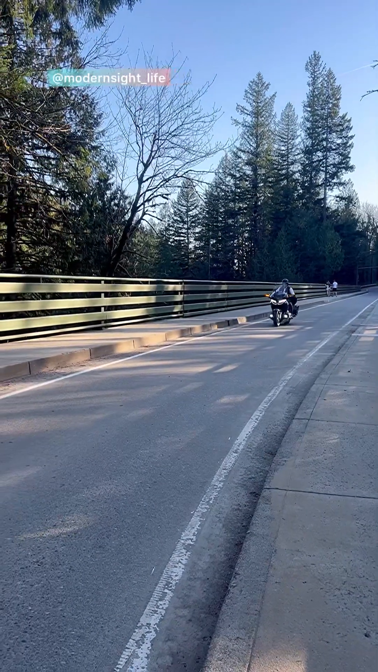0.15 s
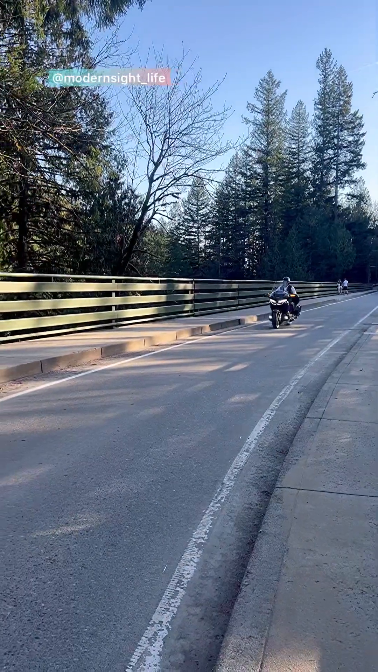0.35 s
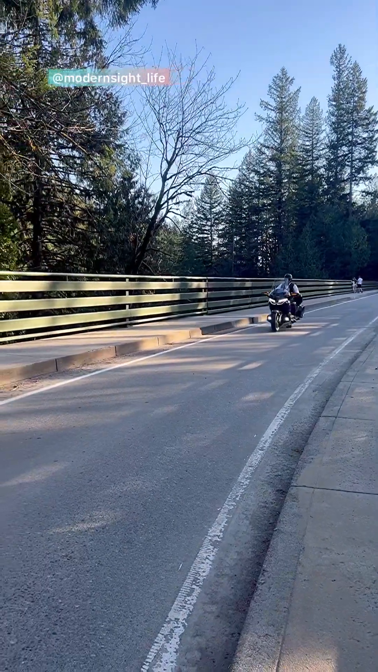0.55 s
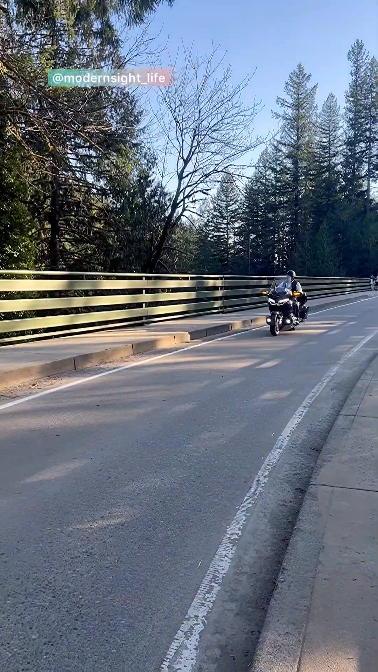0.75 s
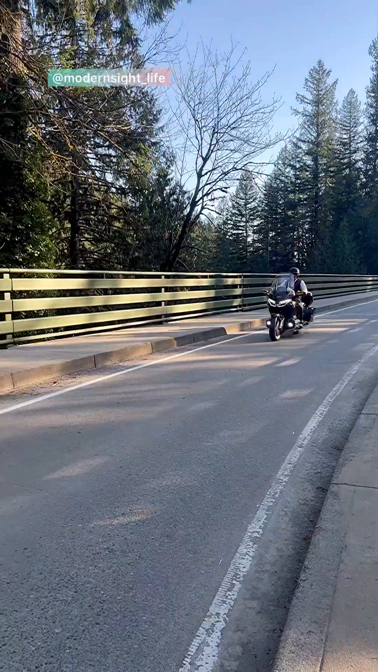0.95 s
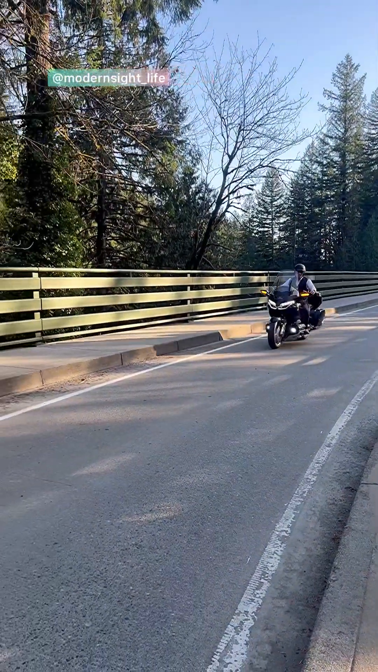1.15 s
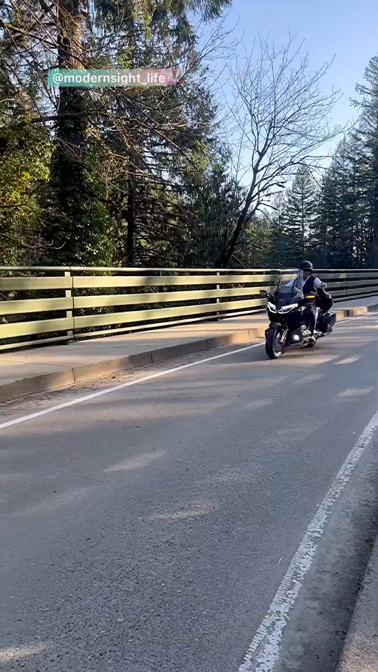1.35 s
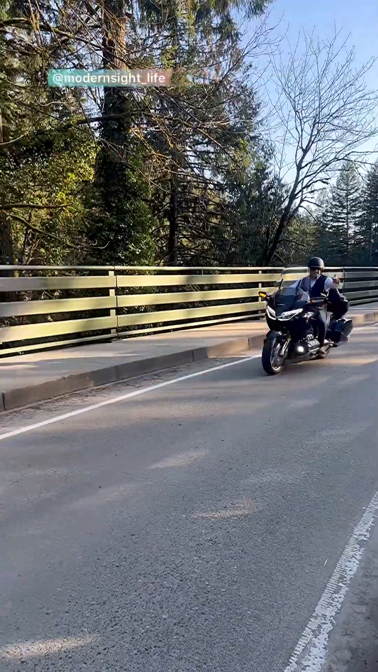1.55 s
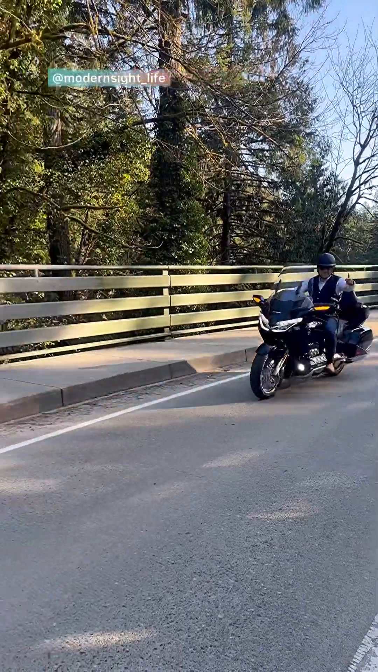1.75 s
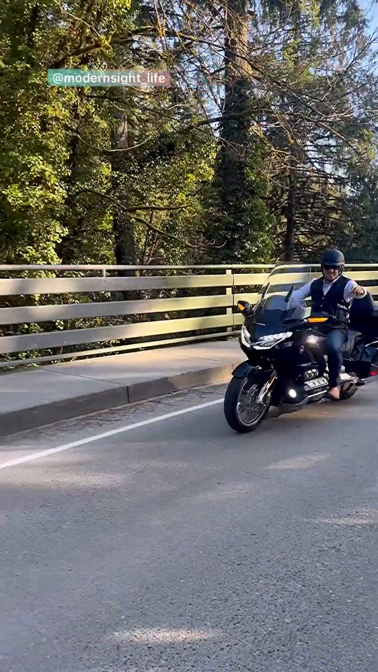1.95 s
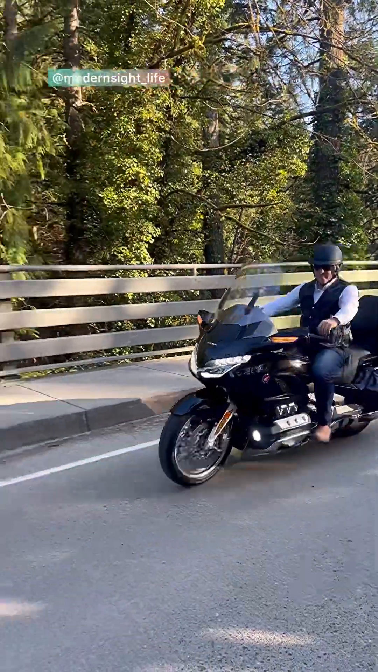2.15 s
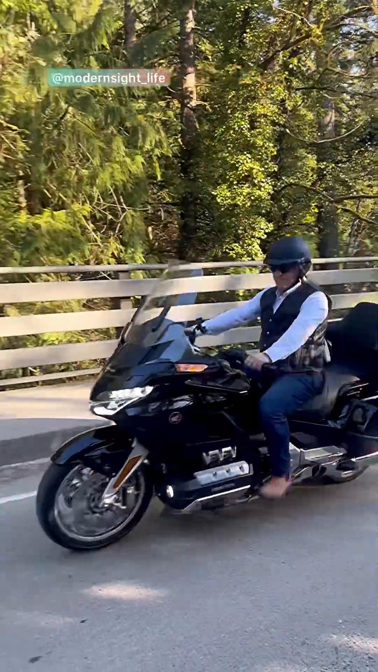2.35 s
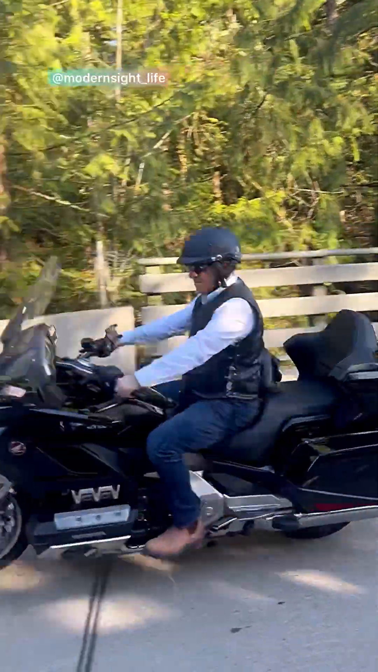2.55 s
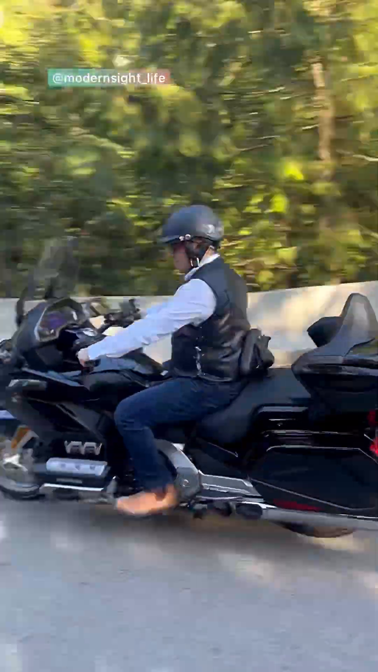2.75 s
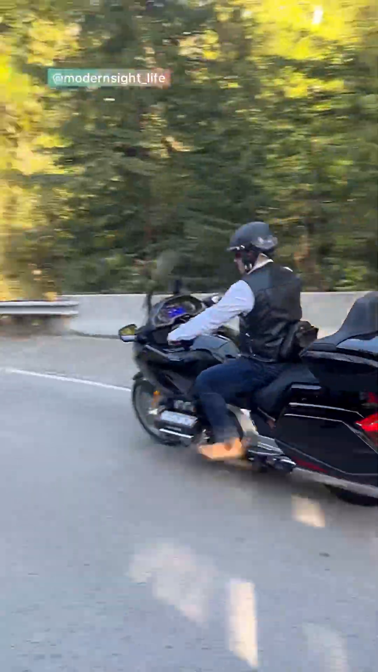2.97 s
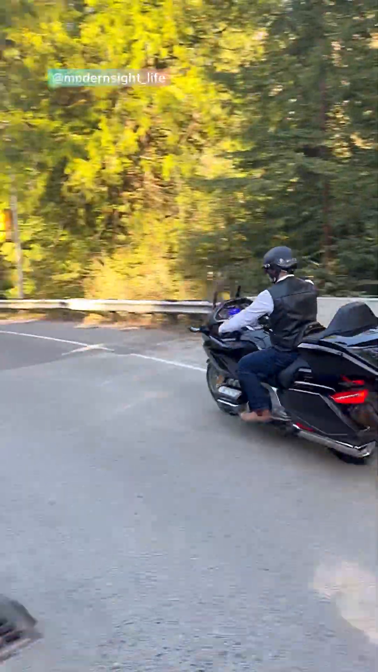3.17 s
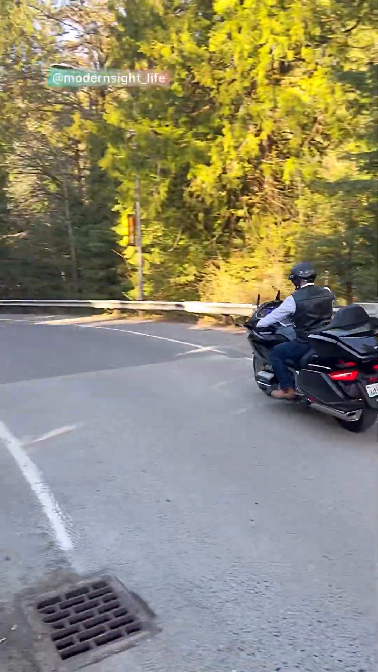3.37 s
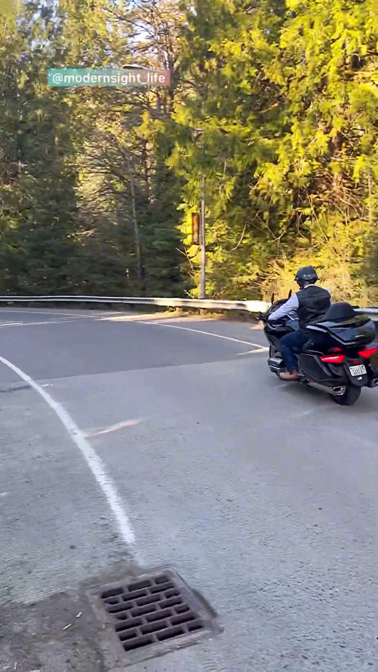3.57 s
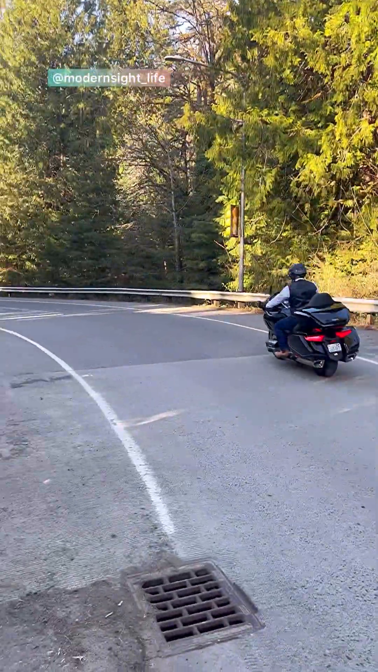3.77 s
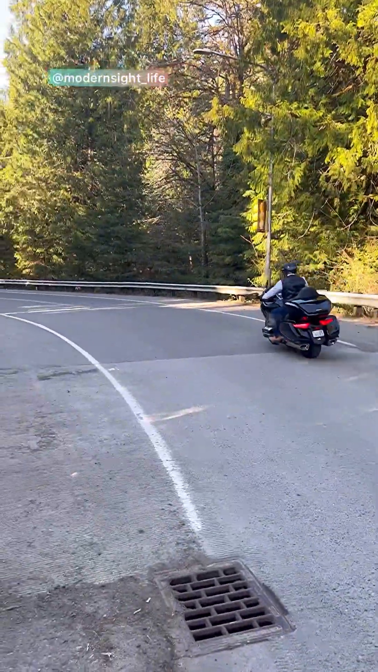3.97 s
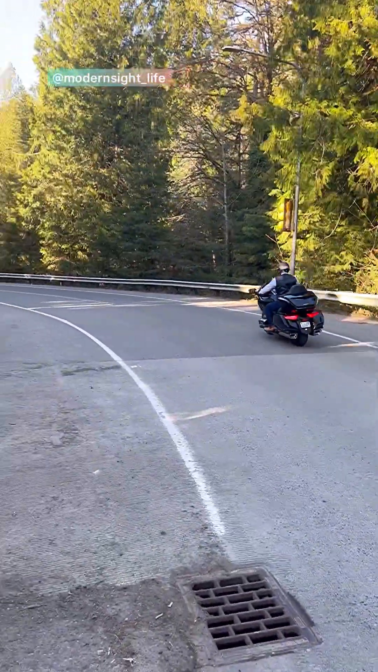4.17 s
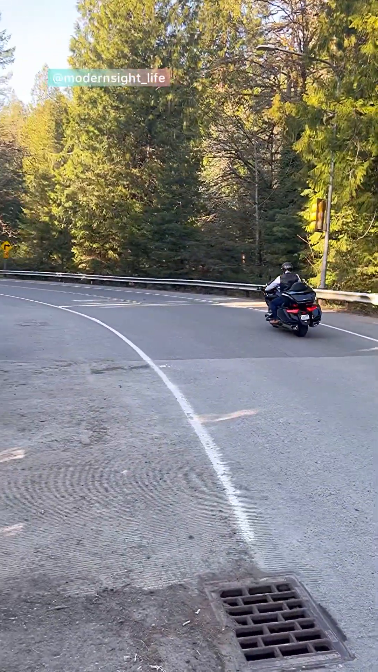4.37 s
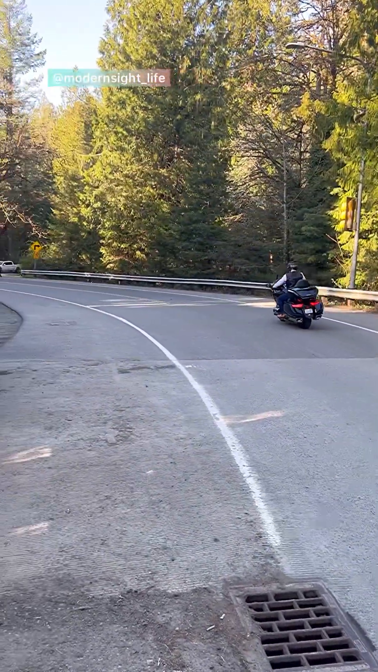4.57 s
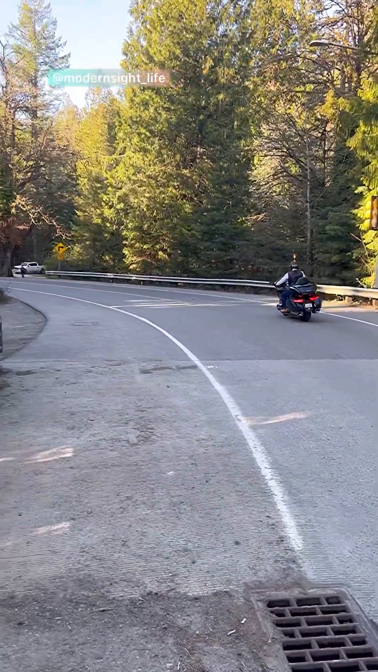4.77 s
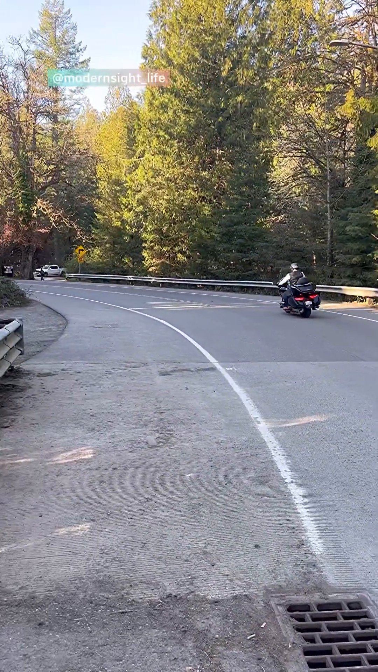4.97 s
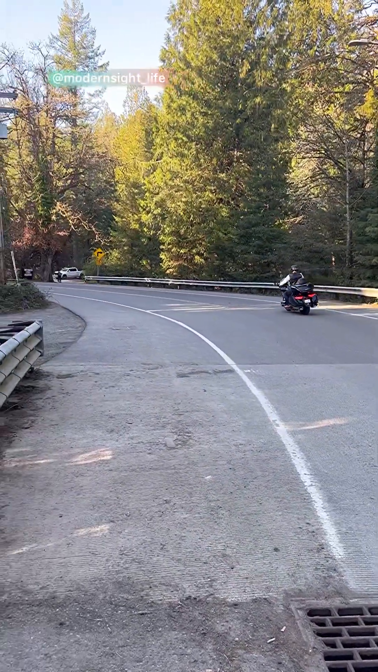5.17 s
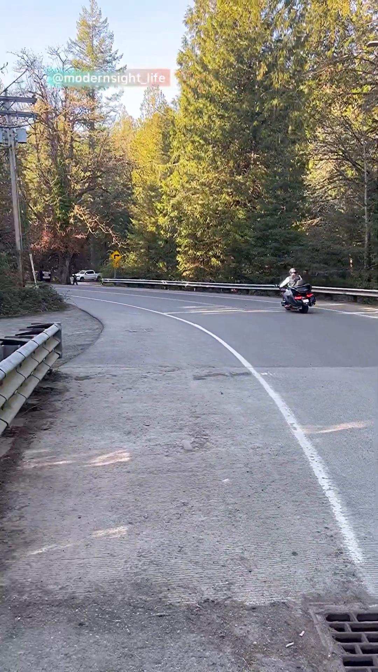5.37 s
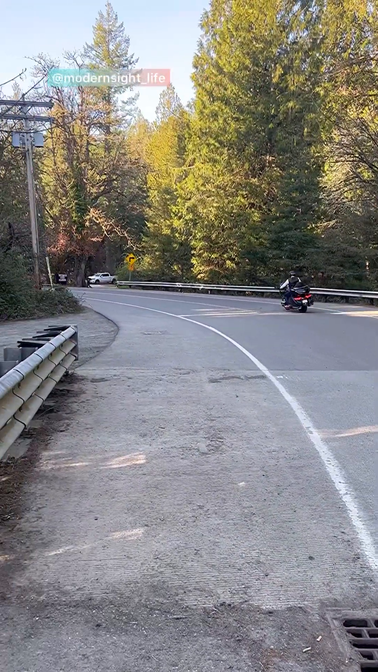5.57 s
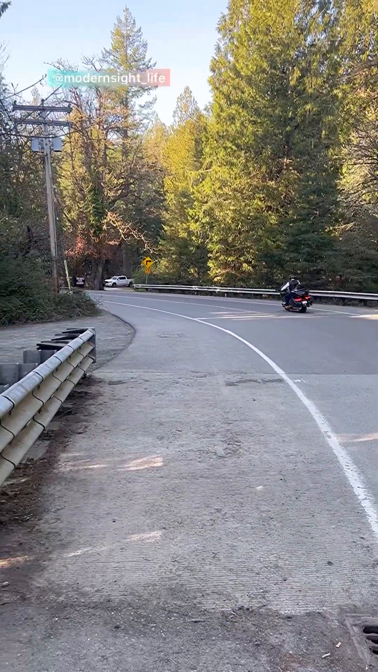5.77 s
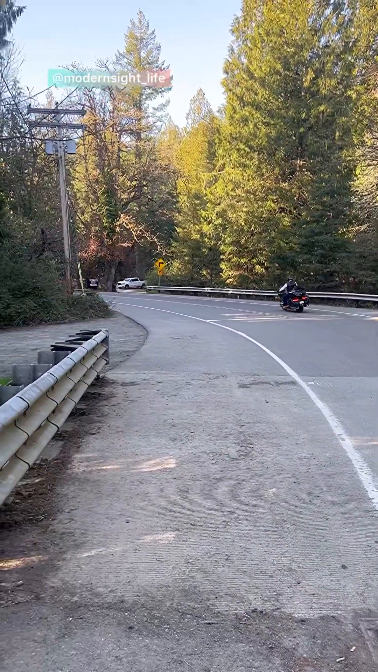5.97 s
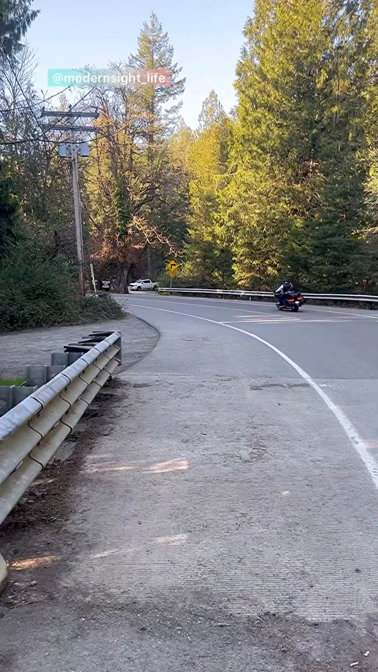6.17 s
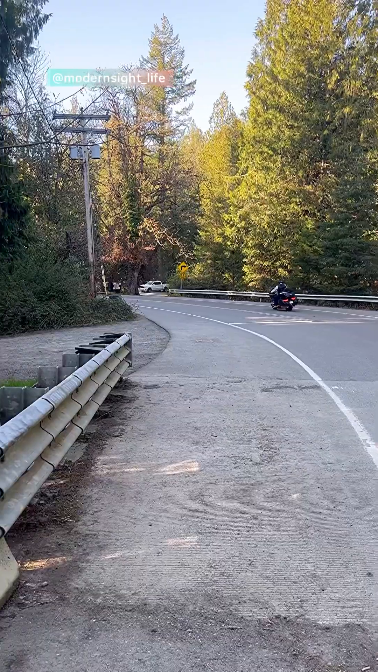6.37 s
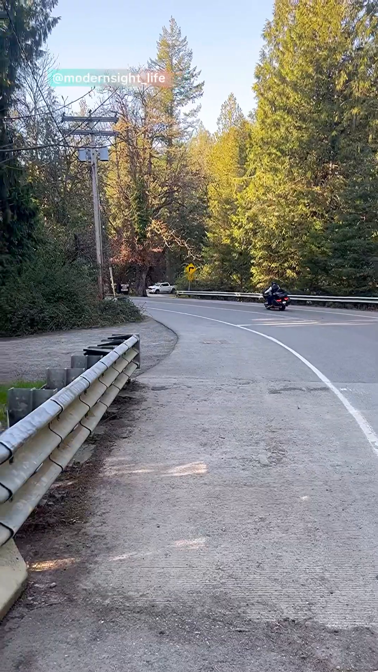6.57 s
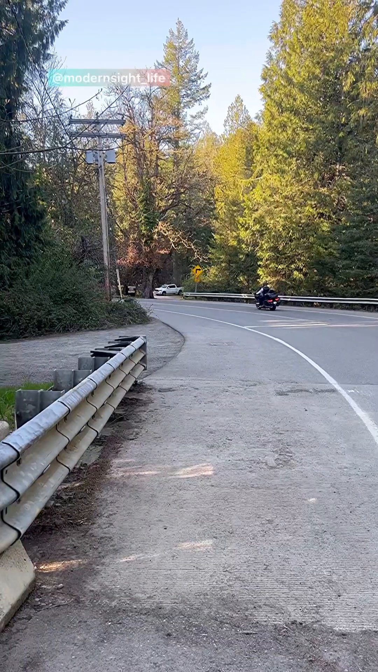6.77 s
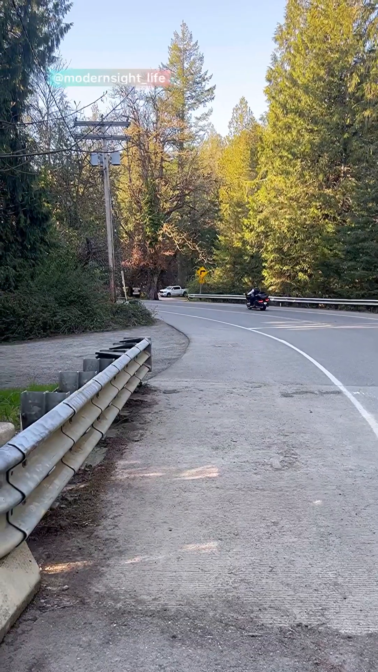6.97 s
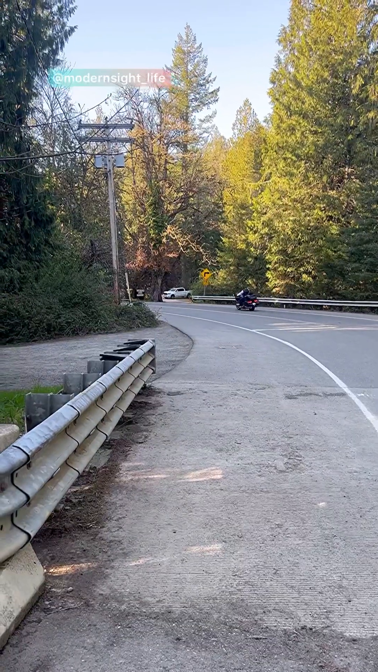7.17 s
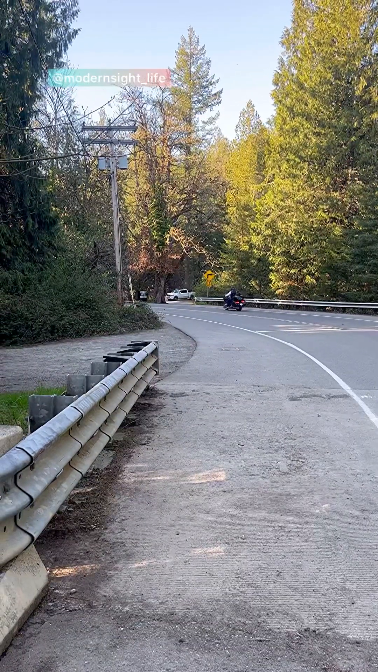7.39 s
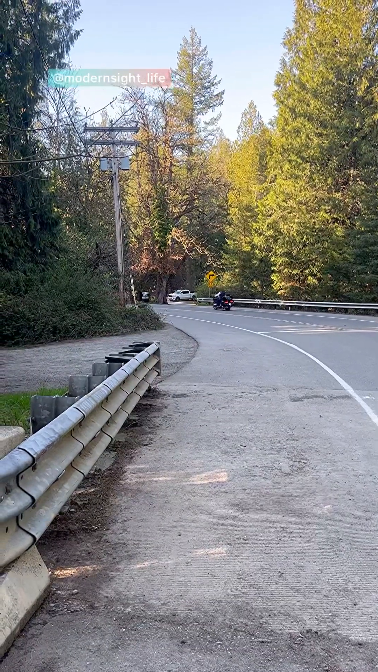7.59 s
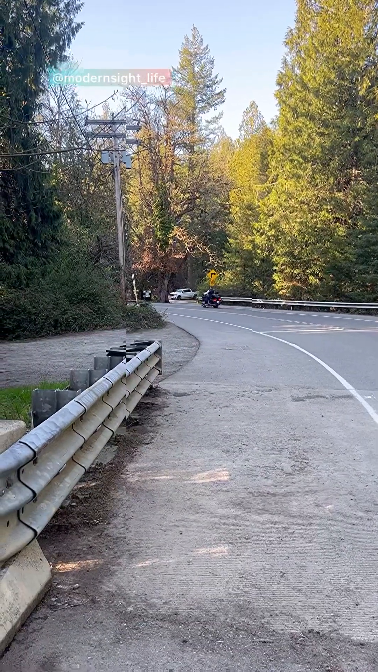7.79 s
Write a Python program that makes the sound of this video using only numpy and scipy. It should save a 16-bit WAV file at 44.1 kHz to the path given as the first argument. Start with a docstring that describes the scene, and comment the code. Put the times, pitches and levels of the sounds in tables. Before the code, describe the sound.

A steady, dark wash of a wooded valley lies underneath throughout. From 0 s a six-cylinder motorcycle coasts closer, its soft low hum slowly sinking in pitch, with faint knocks and gritty ticks near 0.3 and 0.5 s. Thin gear whine appears around 1.4 s while roar and tyre hiss grow. At 2.5 s wheels thump over a joint and the machine is suddenly close and full, a deep throbbing purr with crisp grit rasps through 3.2 s. The throttle is blipped twice, briefly near 2.9 s and strongly around 3.2 s, the pitch flaring up then falling by 3.4 s. It pulls away with a smooth, uneven burble, pitch gradually climbing; mellow whines glide upward from 3.6 to 6.5 s, and grit snaps at 4.4 s. Roar and hiss recede. Around 7.3 s the distant throttle shuts and the hum drops away. Close-set stereo microphones, open air, no obvious echo.

```python
"""A six-cylinder motorcycle coasts up over a bridge towards two close-set microphones, in the wash of a wooded valley.
Tones locked to a count of firings give drone and gear whine; shaped noise gives rumble, roar and hiss.
Damped modes knock and bright swells rasp from the road; the throttle is blipped twice at closest approach, 2 m off.
Then it pulls away round a bend, three gliding whines rising under it, and the throttle is shut off in the distance."""
import sys
import numpy as np
from scipy import signal
from scipy.fft import rfft, irfft, next_fast_len
from scipy.io import wavfile
from scipy.ndimage import uniform_filter1d

SR = 44100
rng = np.random.default_rng(int(sys.argv[2]) if len(sys.argv) > 2 else 0)


def inscribe(sig):
    """Save sig as 16-bit PCM at rate SR to the path in sys.argv[1].

    A 1-D sig is mono; a 2-D sig holds one channel per row.
    Samples are clipped to [-1, 1] before scaling.
    """
    pcm = np.round(np.clip(np.atleast_2d(sig).T, -1, 1) * 32767)
    wavfile.write(sys.argv[1], SR, pcm.astype(np.int16))


N = 345567
T = np.arange(N) / SR  # s

# engine speed and its two strongest tones:
# t/s, firing rate f/Hz, rms level/dB of the tone at that rate, rms level/dB of the tone at twice the rate
ENGINE_RUN = [(0.0, 71.75, -41.5, -41.5), (0.85, 65.5, -43, -39), (1.44, 63.1, -41.5, -31),
              (2.31, 59.82, -34, -28.5), (2.46, 58.83, -48, -24.5), (2.51, 58.5, -29, -20),
              (2.535, 58.3, -32, -30), (2.58, 57.4, -32, -22), (2.65, 58.9, -31, -21.5),
              (2.69, 59.3, -20, -18), (2.725, 58.1, -30, -15.5), (2.775, 59.7, -30, -20),
              (2.82, 58.7, -28, -15.5), (2.93, 65.4, -21, -19), (3.02, 60.14, -25, -17),
              (3.06, 64.4, -26, -20), (3.1, 70, -20, -16), (3.14, 75.4, -16.5, -26.5),
              (3.18, 81.7, -17.5, -17.5), (3.22, 85.1, -16.5, -22), (3.28, 82.66, -21.5, -24.5),
              (3.36, 69.7, -30.5, -29), (3.5, 73.7, -21.5, -27), (3.71, 71.5, -30.5, -32),
              (4.08, 73.44, -28.5, -35), (5.08, 78.1, -31.5, -34.5), (5.54, 80.96, -33, -32.5),
              (6.04, 82.05, -39.5, -36), (6.55, 84.5, -32.5, -44), (6.85, 85.6, -33.5, -41),
              (7.31, 87.8, -34.5, -46.5), (7.46, 82.3, -49.5, -55), (7.58, 77.5, -43.5, -53),
              (7.84, 67.9, -44, -36.5)]
# tyre hiss spectrum: f/Hz, relative level/dB
HISS_COLOUR = [(2500, -21), (4000, -12), (5300, -8.5), (6300, -1), (8000, -1), (10500, -5.5), (13000, -7),
               (15000, -28)]
# how the sound differs between left and right: f/Hz, likeness of noise (0-1), phase/rad by which left leads, #
# left minus right level/dB; from about 5.8 to 7.6 kHz the noise is nearly the same in both channels
MICROPHONES = [(60, 1, 0, 0), (200, .995, .15, -2), (340, .93, .35, -4.2), (520, .68, .9, -1.5),
               (860, .68, 1.1, 3.2), (1100, .52, .9, 3), (1400, .55, .5, 3), (2000, .8, .2, 1.5),
               (2400, .55, 1.6, .3), (2750, .78, 2.7, .3), (3100, .62, 3.1, .5), (3700, .15, 4.3, .6),
               (4200, .58, 5.7, .5), (4800, .52, 5.2, .5), (5350, .55, 3.7, .5), (5800, .88, 6.6, .4),
               (6500, .995, 6.28, .3), (7600, .99, 6.2, .3), (8000, .88, 6.0, .3), (9000, .72, 5.4, .4),
               (10400, .65, 5.1, .4), (11700, .68, 4.1, 0), (12600, .95, 3.2, 0)]


def amp(db):
    """Gain from dB."""
    return 10 ** (np.asarray(db) / 20)


def evened(x):
    """Scales to rms 1."""
    return x / np.sqrt(np.mean(x ** 2) + 1e-20)


def curves(rows):
    """Every column of a time table, at each sample."""
    s, *columns = np.transpose(rows)
    return [np.interp(T, s, column) for column in columns]


def read(points, hz, axis=1):
    """One column of a frequency table, interpolated along log frequency."""
    points = np.asarray(points)
    return np.interp(np.log(hz + 1), np.log(points[:, 0] + 1), points[:, axis])


def waver(hz):
    """Random drift of rms 1: white noise low-passed at hz."""
    low_pass = signal.butter(2, hz, fs=SR, output="sos")
    return evened(signal.sosfilt(low_pass, rng.standard_normal(N)))


def swell(s, length):
    """A bell of peak 1 centred at s, down to 1/e half a length (s) to either side."""
    return np.exp(-((T - s) / length) ** 2 * 4)


def noise(colour, patchy_db, flicker_db):
    """Random short-time spectra at both microphones, with drifting patches and a flicker shared by all bands."""
    frames, hz = N // 256 + 5, np.fft.rfftfreq(1024, 1 / SR)
    a, b, c, d, patches = rng.standard_normal((frames, 513, 5)).T
    patches = uniform_filter1d(patches, size=6, axis=0)  # across frequency
    patches = evened(uniform_filter1d(patches, size=14, axis=1))  # across time
    flicker = evened(uniform_filter1d(rng.standard_normal(frames), size=5))
    likeness = np.clip(read(MICROPHONES, hz), 0, 1)[:, None]
    left, other = a + 1j * b, c + 1j * d
    right = likeness * left + np.sqrt(1 - likeness ** 2) * other
    level_db = read(colour, hz)[:, None] + patchy_db * patches + flicker_db * flicker
    spectra = np.array([left, right]) * amp(level_db)
    return evened(signal.istft(spectra, nperseg=1024, noverlap=768)[1][:, :N])


def drone(db, turns):
    """A tone whose phase drifts slowly as the path to the listener changes."""
    return amp(db) * np.cos(2 * np.pi * (turns + .025 * waver(hz=0.68)))


def passing(nearest_s, near_db, coming_db, leaving_db, share):
    """Level in dB of a layer that rolls past on a straight line, fading with distance and following the load."""
    # how hard the engine pulls: eases at the gear change, drives out of the bend, shuts off: t/s, level/dB
    load = [(2.6, -4), (2.75, 1.5), (3.27, 2), (3.36, 1.5), (3.55, -0.5), (3.8, 0.5), (4.5, 3.5), (5.0, 1),
            (6.0, 0), (6.55, 1.8), (7.3, -2.5), (7.44, -4.5), (7.8, -1.5)]
    speed_m_per_s, closest_m = 6.3, 2.17
    metres = np.hypot(closest_m, speed_m_per_s * (T - nearest_s))
    db_per_doubling = np.where(T < nearest_s, coming_db, leaving_db)
    fade_db = db_per_doubling * np.log2(metres / closest_m)
    return near_db - fade_db + share * curves(load)[0]


def valley():
    """The steady wash of the wooded valley: softly flickering noise, weakest in the treble."""
    # valley spectrum: f/Hz, relative level/dB
    valley_colour = [(30, -23), (60, 6), (150, 2.5), (300, -5), (850, -9), (1300, -11), (2000, -20),
                     (2800, -15.5), (3700, -19.5), (5300, -26), (8000, -31), (10500, -44), (15000, -64)]
    return amp(-41.5) * noise(valley_colour, patchy_db=1.4, flicker_db=0.24)


def firings():
    """Count of firings so far: the summed firing rate, slightly unsteady."""
    rate_hz = curves(ENGINE_RUN)[0] * (1 + 0.00276 * waver(hz=9.8))
    return np.cumsum(rate_hz) / SR


def in_step(k):
    """Where, in turns, multiple k of the cycle starts when the cylinders fire in their fixed pattern."""
    # pipes differ in length and cylinders in strength: arrival late by this share of a firing gap, strength
    cylinders = [(.003, 1.05), (-.013, .95), (.001, 1.05), (-.026, .95), (-.004, 1.05), (.039, .95)]
    late, strength = np.transpose(cylinders)
    pulses = strength * np.exp(-2j * np.pi * k * (np.arange(6) + late) / 6)
    silencer_lag = .4 * (k > 14)  # turns; the higher multiples leave the silencer late
    return np.angle(pulses.sum()) / (2 * np.pi) - silencer_lag


def exhaust(turns):
    """Tones at the firing rate and its double, plus multiples of the six-firing cycle from uneven cylinders."""
    # the second tone pulls against the first while coming, peaks with it once the pipes point back:
    # t/s, shift in turns
    second_shift = [(2.2, -.4), (2.8, .05), (3.1, .15), (3.22, .35), (3.35, .17), (3.9, .15), (4.3, 0),
                    (5.6, .05), (6.3, .2), (6.9, .05)]
    # multiple of the cycle, relative level/dB: coasting up, alongside, revving, just past, turning away, leaving, far
    uneven = [(7, -10, -12, -15, -16, -20, -16, -9), (8, -7, -10, -4.5, -8, -4, -1, -3),
              (9, -4, -3.5, -5, -2.5, 2, 5.5, -3.5), (10, -3, -5.5, -2, -9, -8, -1.5, -1),
              (11, -5, -14, -10, -18, -17, -18, -18), (13, -9, -14, -11, -15, -20, -20, -12),
              (14, -5, -7, -2, -6.5, -4, -2.5, 0), (15, 1, -9, -9.5, -15, -13, -5.5, -4),
              (16, -4, -10, -11, -12, -18, -14, -13), (17, -1, -12, -15, -10, -16, -20, -14),
              (18, 4.5, -9, -14, -5.5, -9, -19, -22), (19, 1.5, -16, -12, -11, -17, -22, -25),
              (20, 0, -13, -12, -4.5, -5.5, -6.5, -13), (21, -5, -15, -16, -15, -13, -12, -24),
              (24, -5, -14, -17, -20, -22, -19, -22)]
    # moments at which those seven level columns hold: t/s
    stages = [2.4, 3.0, 3.2, 3.6, 4.15, 4.8, 5.9]
    # nearest t/s, level/dB there, dB lost per doubled distance coming, the same leaving, share of the load
    uneven_pass = (3, -27, 8, 4.5, 1.35)
    first_db, second_db = curves(ENGINE_RUN)[1:]
    first = drone(first_db + 1.0 * waver(hz=15.0), turns)
    second = drone(second_db + .6 * waver(hz=8), 2 * turns + curves(second_shift)[0])
    out = np.sqrt(2) * (first + second)  # peak from rms
    uneven_db = passing(*uneven_pass)
    for k, *stage_db in uneven:  # load and direction change the balance
        db = uneven_db + np.interp(T, stages, stage_db) + 1.1 * waver(hz=3.0)
        out += drone(db, k / 6 * turns + in_step(k))
    return out


def gear_whines(turns):
    """Meshing teeth turning with the engine: thin tones that flutter and blur."""
    # multiple of the firing rate, rms blur in turns, then a list of t/s, peak level/dB
    whines = [(7.08, .04, [(0, -53), (.5, -49), (.9, -60), (1.4, -40), (2.1, -48), (2.4, -79)]),
              (29.45, .3, [(1.4, -70), (1.9, -54), (2.3, -64), (3.3, -62), (3.55, -54), (3.9, -57),
              (4.2, -72), (6.4, -72), (6.8, -61), (7.35, -62), (7.5, -75)])]
    out = np.zeros(N)
    for k, blur, rows in whines:
        out += drone(curves(rows)[0] + 1.8 * waver(hz=7), k * turns + blur * waver(hz=9))
    return out


def roar(db, turns):
    """Tyre and engine-case noise turning from front to side to rear; side and rear puff with each firing."""
    # roar spectra heard from each direction: f/Hz, relative level/dB
    front_colour, side_colour = [(150, -49), (300, 2), (450, -2), (700, -3.5), (1300, -5.5), (2000, -9),
                                 (2800, -5.5), (3700, -13), (5300, -19.5), (7000, -39)], [(150, -33), (300, 1), (450, -4.5), (700, 2.5),
                                                     (950, -1), (1300, -5), (1700, -5), (2300, -10),
                                                     (2800, -8.5), (3800, -13.5), (5300, -24), (7000, -47)]
    rear_colour = [(150, -6), (300, -1), (450, -4.5), (700, 1), (900, -6.5), (1300, -14), (2000, -15),
                   (2800, -12), (3700, -18.5), (5300, -21.5), (7000, -92)]
    # moments at which front, side and rear face the microphones: t/s
    facing = [1.58, 2.68, 3.96]
    # brief changes of level while alongside, mostly surges: t/s, gain level/dB, length/s
    surges = [(2.54, 3, .025), (2.58, 3, .02), (2.735, 3.5, .07), (2.8, -2, .04), (2.97, 3.5, .07),
              (3.04, 2, .02)]
    heard = []
    for share, colour in zip(np.eye(3), (front_colour, side_colour, rear_colour)):
        face = np.sqrt(np.interp(T, facing, share))  # equal-power crossfade
        heard.append(face * noise(colour, patchy_db=2.0, flicker_db=0.5))
    front, side, rear = heard
    puffs = evened(1 + 0.9 * np.exp(-(turns % 1) / 0.3))
    surge_db = sum(gain_db * swell(s, length) for s, gain_db, length in surges)
    return amp(db + surge_db) * (front + (side + rear) * puffs)


def rumble():
    """Low noise that swells and fades with the passing distance and the load."""
    # rumble spectrum: f/Hz, relative level/dB
    rumble_colour = [(25, -30), (40, -37), (60, 1.5), (120, 2.5), (200, -3), (300, -4), (450, -1.5),
                     (700, -62)]
    # nearest t/s, level/dB there, dB lost per doubled distance coming, the same leaving, share of the load
    rumble_pass = (2.5, -30, 3, 4.5, 1.1)
    return amp(passing(*rumble_pass)) * noise(rumble_colour, patchy_db=0.7, flicker_db=-0.5)


def hiss(db):
    """Treble noise of the tyres, at a level that follows db."""
    return amp(db) * noise(HISS_COLOUR, patchy_db=1.4, flicker_db=0.8)


def knocks():
    """Wheels over joints in the road: each blow rings one low, well damped mode."""
    # t/s, level/dB before onset and decay, pitch f/Hz, time/s to fall 60 dB
    joints = [(0.2992, -16.5, 377, 0.043), (.49, -20, 221, 0.089), (2.492, -8.5, 174, 0.058),
              (2.506, -6.5, 165, 0.067), (2.706, -15, 85, 0.13)]
    out = np.zeros(N)
    for s, db, hz, t60 in joints:
        t = np.maximum(T - s, 0)
        onset = 1 - np.exp(-t / 0.005)
        out += amp(db - 60 * t / t60) * onset * np.sin(2 * np.pi * hz * t)
    return out


def rasps():
    """Brief swells of bright noise, as of grit under the tyres, each led by a thinner fizz."""
    # t/s, body level/dB, length/s, level/dB of the leading fizz
    grit = [(.302, -48, .012, -64), (.488, -45, .022, -59), (.828, -45, .03, -66), (2.615, -42, .012, -57),
            (2.718, -35, .008, -50), (2.76, -39, .012, -54), (2.843, -36, .012, -52),
            (3.035, -36, .012, -54), (3.078, -38, .01, -56), (3.195, -42, .015, -57),
            (3.585, -48, .04, -55), (4.405, -36.5, .022, -50.5)]
    # rasp spectrum: f/Hz, relative level/dB
    rasp_colour = [(100, -50), (900, -14), (1800, -2), (2600, 2), (3500, -1), (4500, -9), (7000, -13),
                   (12000, -24), (15000, -25)]
    body = sum(amp(db) * swell(s, length) for s, db, length, _ in grit)
    # the fizz comes 0.7 of the length early
    fizz = sum(amp(db) * swell(s - .7 * length, length) for s, _, length, db in grit)
    rasp = body * noise(rasp_colour, patchy_db=1, flicker_db=0)
    return rasp + fizz * noise(HISS_COLOUR, patchy_db=1, flicker_db=0)


def wheel_whines():
    """Three tones at fixed steps that glide up together as it pulls away, flutter and blur."""
    # t/s, middle f/Hz, peak level/dB of the low, middle and upper tone
    glide = [(3.55, 596, -60, -74, -80), (3.7, 606, -43, -60, -74), (3.85, 624, -43, -46, -66),
             (4.3, 637, -47, -46, -56), (4.6, 645, -62, -46, -46), (4.9, 660, -80, -46, -43.5),
             (5.3, 680, -80, -47, -47), (5.7, 698, -80, -48, -50), (6.1, 712, -80, -53, -52),
             (6.3, 718, -80, -63, -62), (6.6, 724, -80, -80, -78)]
    hz, *levels_db = curves(glide)
    turns = np.cumsum(hz) / SR
    out = np.zeros(N)
    for k, db in zip((.5, 1, 1.206), levels_db):  # multiples of the middle whine
        out += drone(db + 1.6 * waver(hz=8), k * turns + .06 * waver(hz=12))
    return out


def scene():
    """The valley, and the motorcycle rolling up, past and away."""
    # roar and hiss rise with the approach and die away: t/s, roar level/dB, hiss level/dB
    noise_levels = [(0.0, -42.5, -57.5), (0.4, -40.5, -55.5), (1.25, -38, -48.5), (1.98, -34.5, -43),
                    (2.4, -33, -38), (2.85, -32.5, -40.5), (3.02, -32, -45), (3.16, -32.5, -46),
                    (3.26, -33, -46.5), (3.36, -36, -50.5), (3.5, -37.5, -48.5), (3.62, -36, -50),
                    (3.78, -39.5, -49.5), (4.15, -38.5, -54.5), (4.5, -38.5, -57), (5.0, -43, -60),
                    (6.0, -44, -65), (6.55, -44, -65.5), (7.3, -44.5, -66), (7.84, -48, -67)]
    roar_db, hiss_db = curves(noise_levels)
    turns = firings()
    motorcycle = exhaust(turns) + gear_whines(turns) + wheel_whines()
    road = roar(roar_db, turns) + rumble() + hiss(hiss_db) + knocks() + rasps()
    return valley() + motorcycle + road


def record(dry):
    """Microphones shift and tilt each band against each other; their sum ends lower than their difference."""
    size = next_fast_len(N + 4096)
    hz = np.fft.rfftfreq(size, 1 / SR)
    # half of each difference goes to either side
    lead = np.exp(.5j * read(MICROPHONES, hz, axis=2)) * amp(read(MICROPHONES, hz, axis=3) / 2)
    bass = 1 / np.sqrt(1 + (48 / (hz + 1)) ** 6)  # small microphones lose the deep bass, below about 48 Hz
    left, right = irfft(rfft(dry, size) * bass * np.array([lead, 1 / lead]), size)[:, :N]

    def low_passed(x, edge_hz):
        """Cuts the treble above edge_hz with a steep symmetric filter."""
        return signal.oaconvolve(x, signal.firwin(511, edge_hz, window=("kaiser", 9), fs=SR), "same")

    total = low_passed((left + right) / 2, edge_hz=12600)
    apart = low_passed((left - right) / 2, edge_hz=15700)
    return np.array([total + apart, total - apart])


dry = scene()
out = record(dry)
inscribe(out)
```